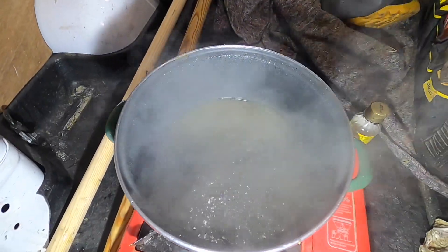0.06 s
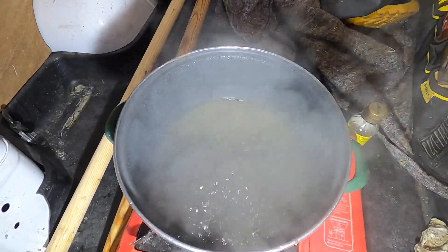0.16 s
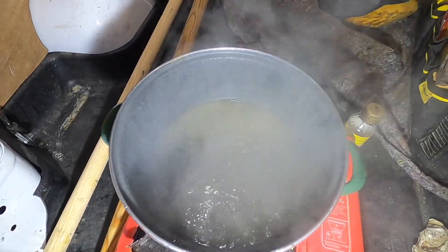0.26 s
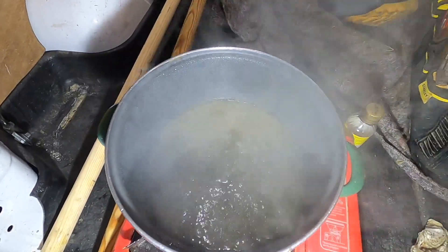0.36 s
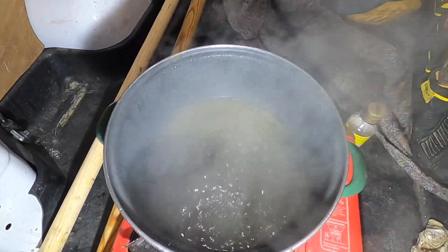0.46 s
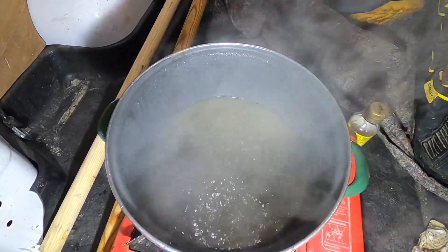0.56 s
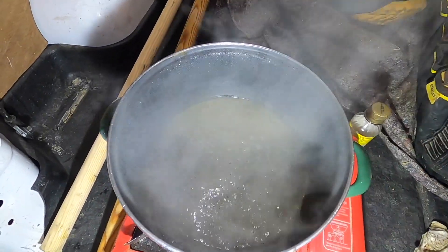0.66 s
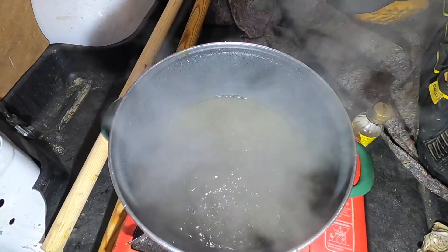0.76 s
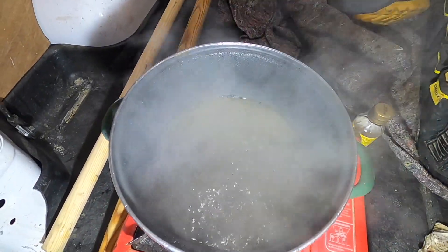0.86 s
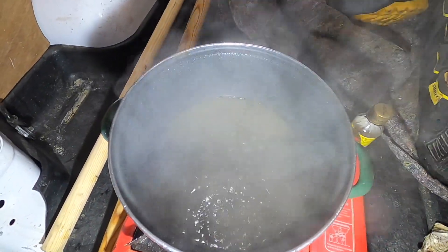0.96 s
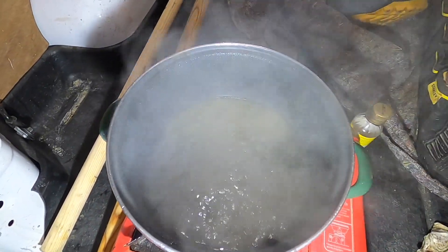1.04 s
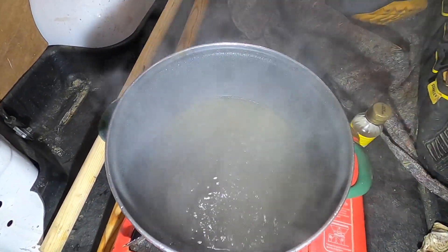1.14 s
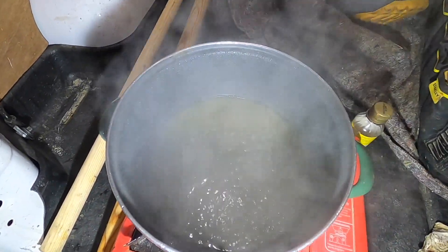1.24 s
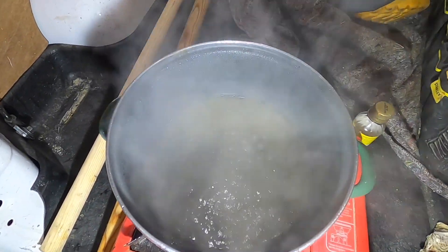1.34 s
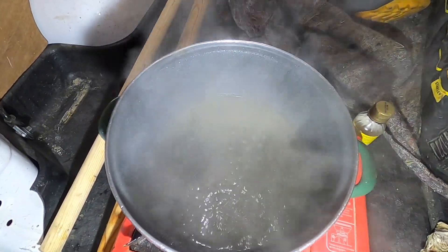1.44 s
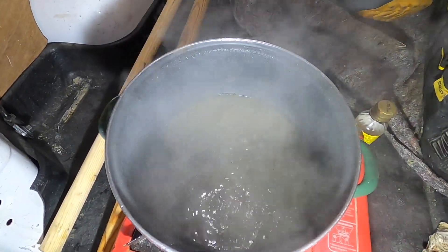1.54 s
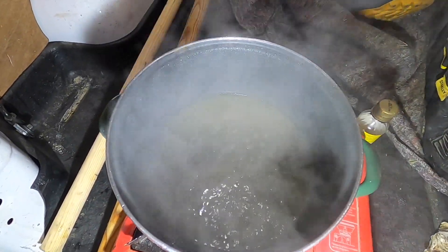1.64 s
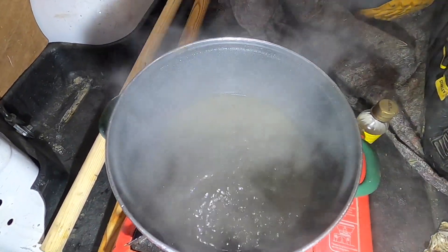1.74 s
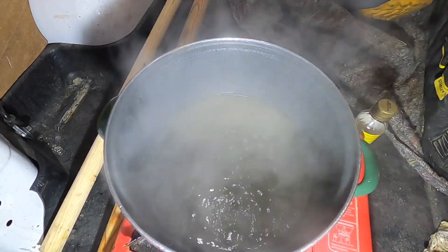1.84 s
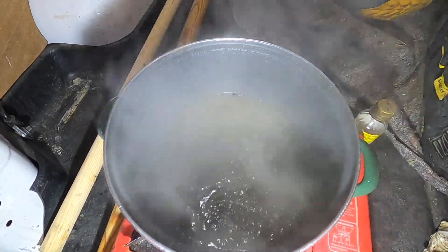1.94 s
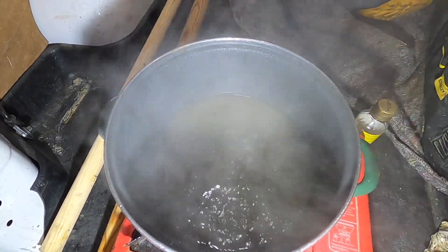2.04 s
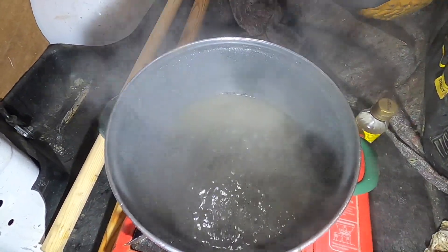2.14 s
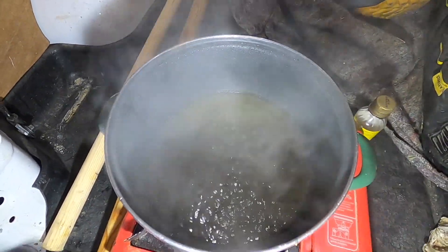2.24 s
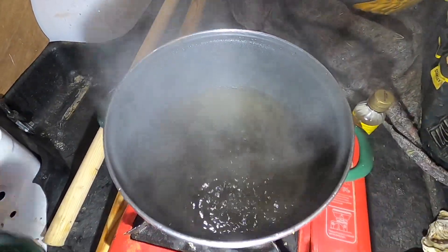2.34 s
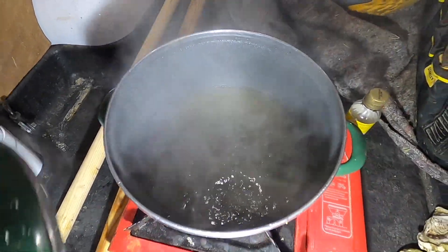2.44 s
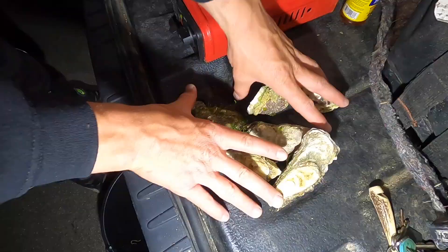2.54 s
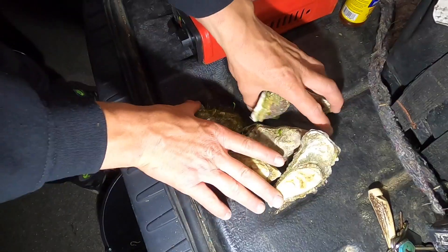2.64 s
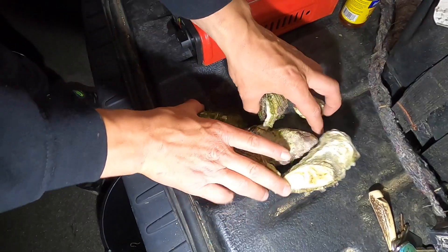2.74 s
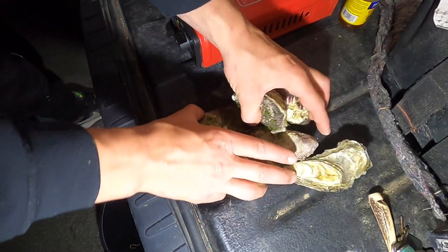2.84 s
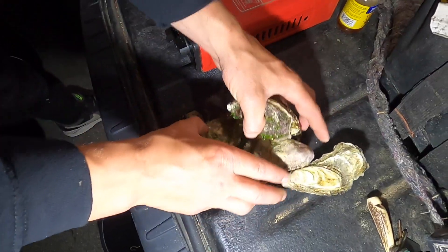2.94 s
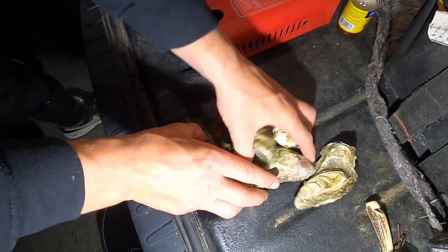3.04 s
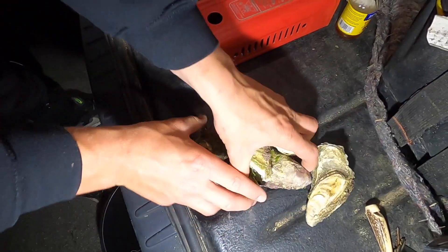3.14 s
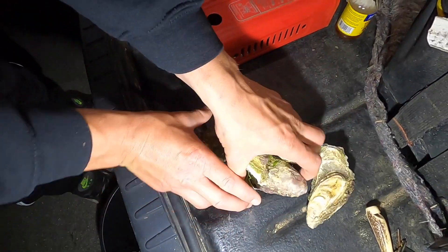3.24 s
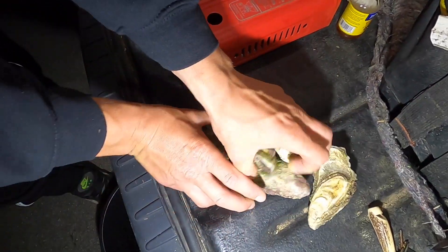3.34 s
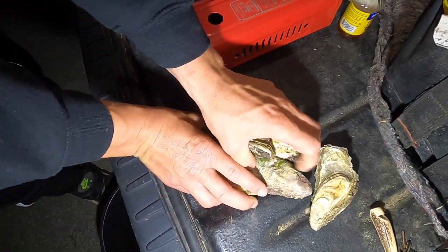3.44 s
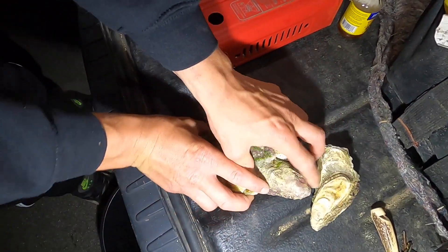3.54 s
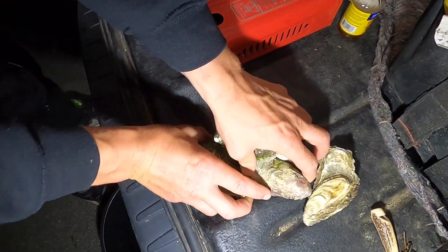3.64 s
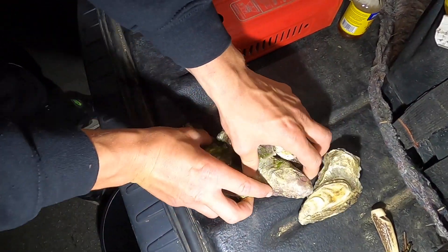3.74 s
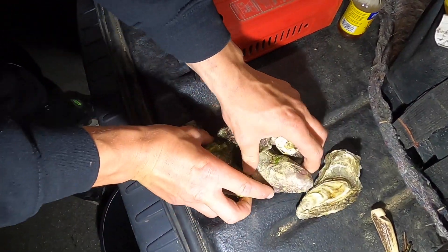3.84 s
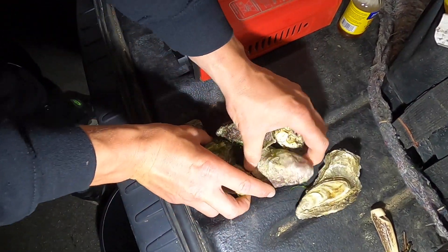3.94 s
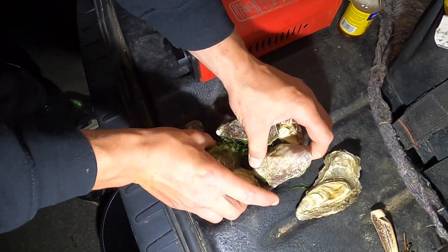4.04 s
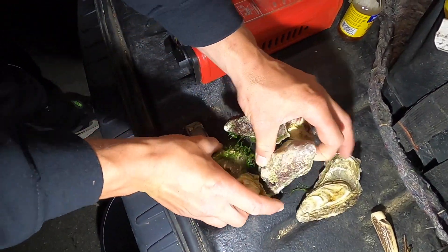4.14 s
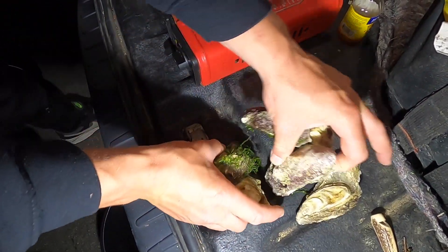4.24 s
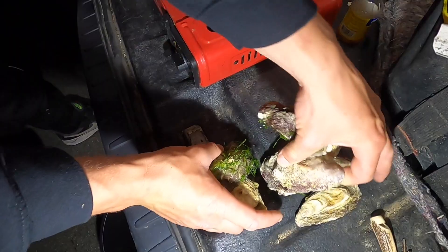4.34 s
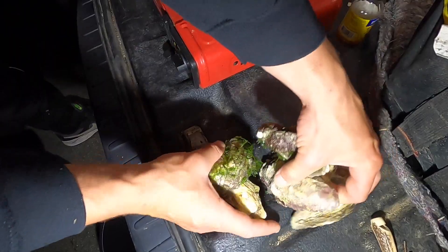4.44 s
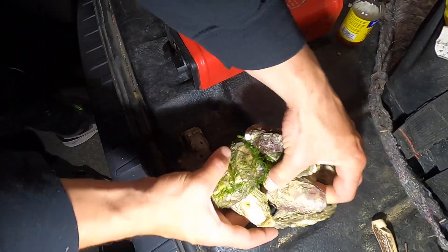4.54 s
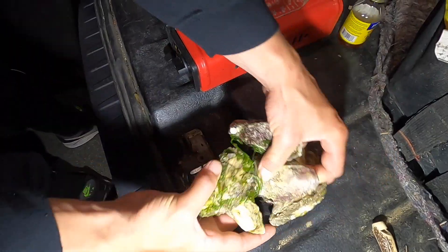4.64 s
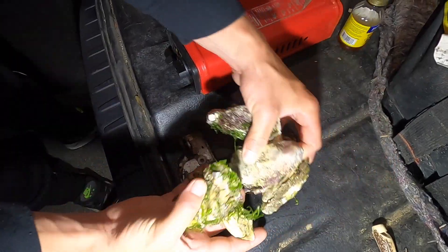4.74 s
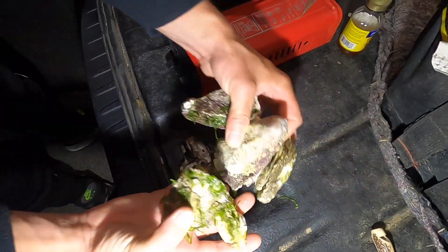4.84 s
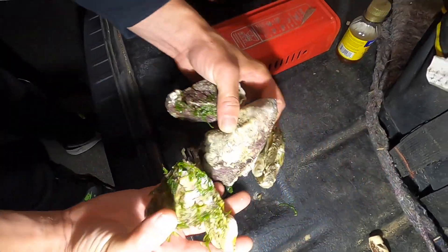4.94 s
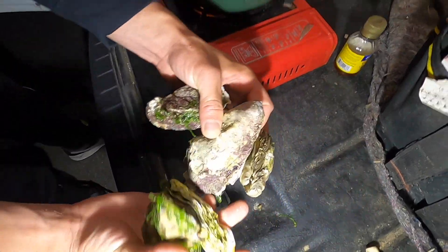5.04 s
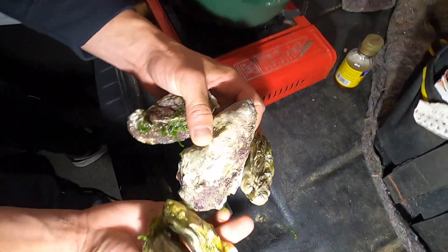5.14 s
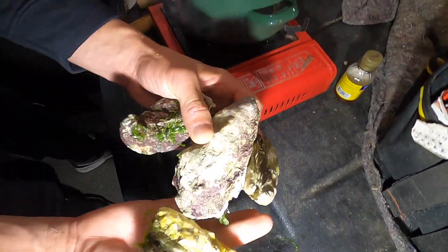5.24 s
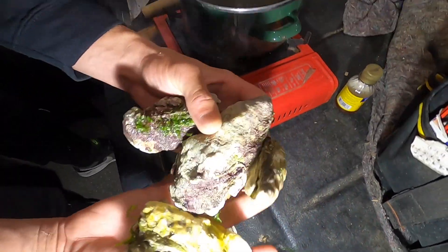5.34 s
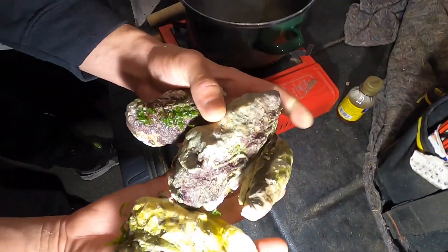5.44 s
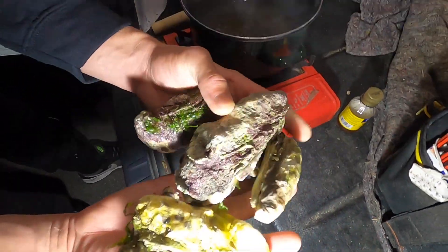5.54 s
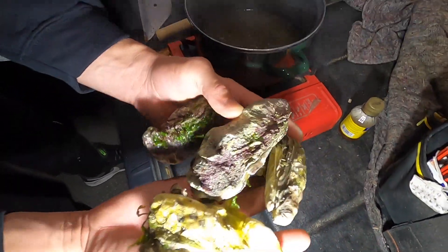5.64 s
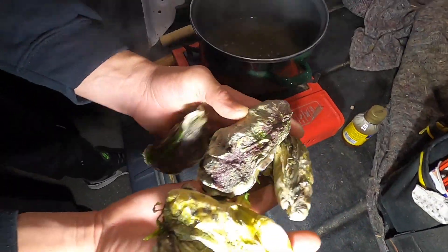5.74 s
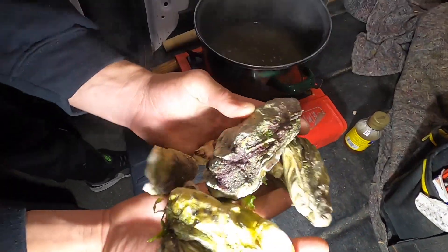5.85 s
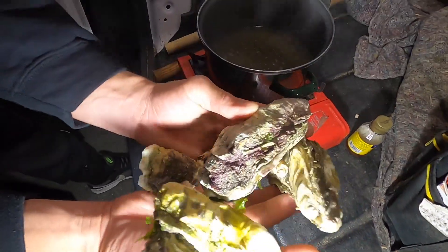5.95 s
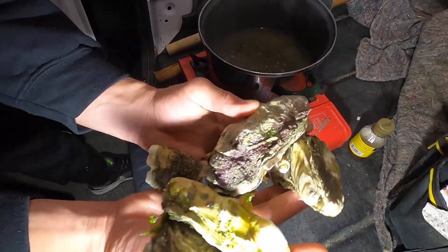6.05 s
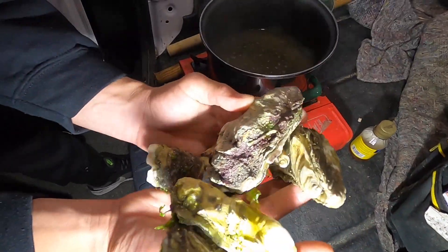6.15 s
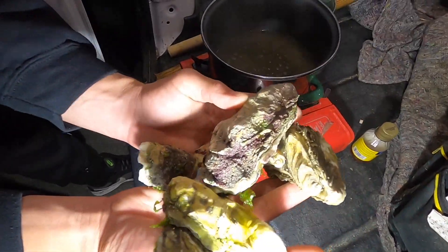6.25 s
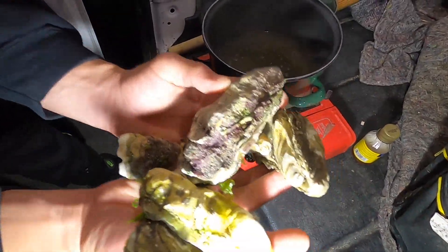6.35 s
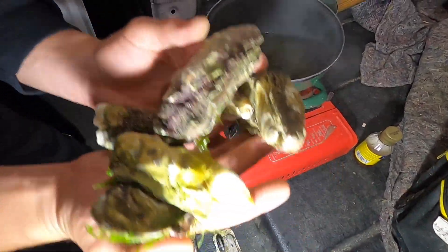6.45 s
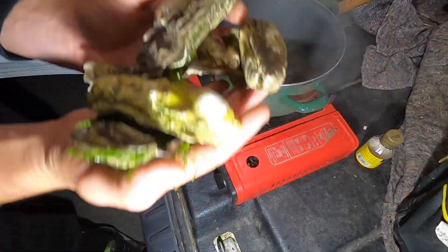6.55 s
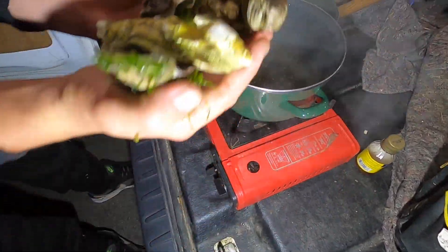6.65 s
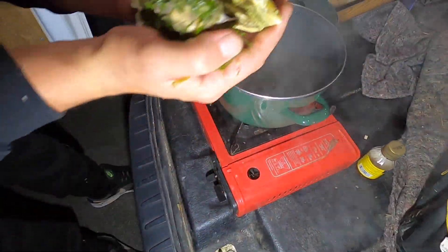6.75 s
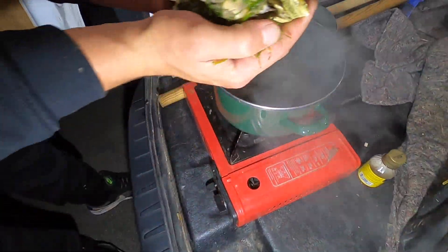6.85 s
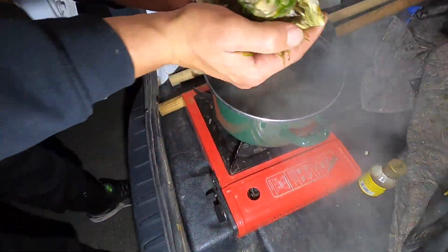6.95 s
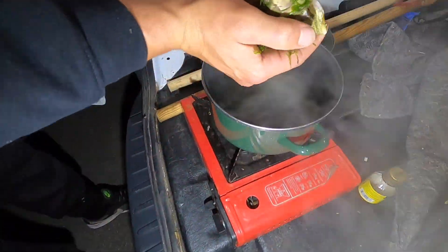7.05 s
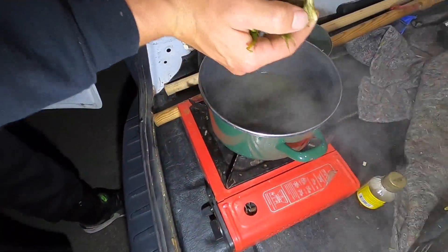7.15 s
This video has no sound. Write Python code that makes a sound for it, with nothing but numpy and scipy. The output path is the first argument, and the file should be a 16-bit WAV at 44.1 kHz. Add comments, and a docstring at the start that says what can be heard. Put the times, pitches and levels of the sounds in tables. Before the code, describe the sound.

Quiet steady hiss and muffled bubbling come first, with deep faint air rumble and tiny ringing ticks. Then rough shells are gathered from a hard liner: dull woody knocks, raspy shoves and short booms from the panel beneath. After a pause comes a sharp shell-on-metal clatter, followed by small dry, stony clicks and gritty rubbing in the hands. Close and dry, inside a vehicle.

```python
"""A pot simmers on a gas burner in the back of a van: shaped noise hisses, hums and flickers over a deep
rumble, with faint ringing taps near the pot. From 2.7 s rough oyster shells are dragged over the ribbed
load floor: streams of tiny blows rasp and boom, and single blows knock and crack. From 5 s the shells
grate and click in the palms, as finer grains and small pitched blows; a quick rattle clanks on metal at
5.2 s. Every blow rings a set of decaying modes."""
import sys
import numpy as np
from scipy import signal
from scipy.fft import rfft, irfft, next_fast_len
from scipy.io import wavfile
from scipy.ndimage import uniform_filter1d

SR = 44100
rng = np.random.default_rng(int(sys.argv[2]) if len(sys.argv) > 2 else 0)


def wav_record(signal):
    """Record a signal, one row per channel, as 16-bit PCM in the file named by sys.argv[1]."""
    frames = np.transpose(np.atleast_2d(signal))
    bounded = np.clip(frames, -1, 1)
    # unit amplitude maps onto the largest positive 16-bit level
    quanta = np.round(bounded * 32767).astype(np.int16)
    wavfile.write(sys.argv[1], SR, quanta)


N = 317079

# Air buffeting the microphone: time_s, level_db
RUMBLE_LEVEL = [(0.0, -74), (0.34, -52.5), (0.44, -68), (0.58, -50.5), (1.7, -63.5), (2.18, -53.5),
                (2.22, -47), (2.74, -62), (3.34, -49), (3.46, -62.5), (3.68, -45), (3.74, -63), (5.27, -50),
                (5.57, -68.5), (5.61, -60), (6.79, -58.5), (7.09, -45), (7.19, -56)]
# Spectrum of burner hiss and simmer, relative: pitch_hz, density_db
HISS_SPECTRUM = [(53, -47), (90, -8.5), (154, -0.5), (227, -4.5), (259, -13), (483, -12.5), (776, -30),
                 (1420, -22.5), (1960, -25.5), (4080, -25.5), (7450, -25.5), (9440, -35), (15500, -49.5)]
# Resonances on top of that spectrum: pitch_hz, width_hz, lift_db
HISS_PEAKS = [(1190, 400, 14), (2470, 390, 7.3), (3150, 210, 5.8), (3880, 350, 5.4), (5000, 160, 3.7),
              (6800, 280, 2.9), (9370, 330, 7.3)]
# Hiss over time, and the van's hum as a change of its lows: time_s, level_db, hum_db
HISS_LEVEL = [(0, -63, -3.5), (2.598, -62.5, -1), (2.68, -64.5, -2), (5, -65.5, 5.5), (5.601, -61.5, -2),
              (6.6, -67, 7), (7.19, -64, -1)]
# The simmer swells near 1.2 kHz: time_s, lift_db
SIMMER_SWELL = [(.5, -5.5), (.6, 6.5), (.88, 9), (.96, -3.5)]
# Left-right likeness of the hiss: pitch_hz, likeness (0 to 1)
HISS_LIKENESS = [(60, 0.99), (130, 1), (290, 0.15), (640, 0.88), (1410, 0.94), (3100, 0.8), (6820, 0.77),
                 (15000, 0.16)]
# Phase by which the left hiss leads: pitch_hz, lead_rad
HISS_LEAD = [(100, 0.44), (4200, 1), (7900, -3), (9500, 0.2), (15000, 3)]
# Stereo width of the background, the difference between the ports over time: time_s, side_db
BACKGROUND_WIDTH = [(0, -19), (.5, -10), (.6, -5.5), (2.62, -1.5), (2.68, -47.5), (4.98, -40), (5.05, -15),
                    (7.19, -2)]

# Modes of what is struck, relative levels: pitch_hz, level_db, t60_s
PANEL_MODES = [(82, -7, 0.2), (123.1, 1, 0.13), (153.4, -6, 0.24), (182.3, 0.5, 0.21), (233, -5.5, 0.12),
               (303, -4, 0.081)]
LINER_MODES = [(463.7, -8.5, 0.051), (570.5, -2, 0.0615), (654.8, 10, 0.02), (708, -6, 0.025),
               (815, 3.5, 0.019), (988, -3, 0.034), (1248, -13, 0.048), (1462, -20.5, 0.048),
               (1500, -33.5, 0.015)]
SHELL_MODES = [(796, 9, 0.024), (1100, 7.5, 0.024), (1564, 24, 0.0062), (1810, 6.5, 0.0062),
               (2045, 10, 0.02), (2500, 0, 0.018), (2749, 10, 0.017), (3370, 11, 0.0036),
               (4096, -1.5, 0.013), (4510, 1, 0.00352), (5365, 1.5, 0.0024), (6070, -18.5, 0.0027),
               (7340, -28.5, 0.022), (8750, -15.5, .004), (10100, -65, .004), (14200, -23.5, 0.0021)]
METAL_MODES = [(586, -19, 0.09), (783, -4.5, 0.075), (991, -2.5, 0.027), (1208, 1, 0.027), (1583, 0, 0.026),
               (2707, 0.5, 0.019), (3300, -10.5, 0.051), (3930, -15.5, 0.047), (3950, 3, 0.0043),
               (5000, -38, 0.0093), (5530, -18.5, 0.028)]
TAP_RING_MODES = [(505, 0, 0.087)]
TAP_TICK_MODES = [(1252, 6, 0.041), (1444, 1, 0.028), (2660, 5, 0.006), (4020, 0, 0.011),
                  (5180, 3.5, 0.0058), (6200, 8.5, 0.0063)]

# Faint taps near the pot: time_s, ring_db, tick_over_ring_db
TAPS = [(0.561, -50.5, 5), (1.024, -53, 2.5), (1.506, -57.5, 4), (2.029, -59, -1), (2.38, -69.5, 16)]
# Shells rattling against the metal: start_s, level_db, favoured_pitch_hz, contact_ms
CLANKS = [(5.159, -14, 1100, 2.5), (5.164, -10, 1970, 5), (5.17, -10.5, 1100, 6.7),
          (5.177, -22.5, 895, 6.9), (5.188, -19.5, 875, 8), (5.199, -16.5, 1500, 3.3)]
# Shells rubbing in the palms: start_s, hold_s, crunch_db, fizz_db, rustle_db
RUBS = [(5.02, 0.0086, -67.5, -64.5, -78), (5.09, .015, -64.5, -65.5, -67),
        (5.168, .012, -32.5, -41.5, -44), (5.23, 0.13, -57.5, -70.5, -84), (5.415, 0.11, -64.5, -77, -66),
        (5.56, 0.056, -54.5, -64, -62), (5.66, 0.16, -71, -72.5, -83), (5.79, 0.1, -61, -62.5, -72),
        (5.925, 0.017, -49.5, -49.5, -53), (6.025, 0.051, -51.5, -55, -50.5), (6.125, 0.021, -57, -53, -47),
        (6.38, 0.0064, -56.5, -53.5, -54.5), (6.5, .01, -63.5, -70.5, -83),
        (6.685, 0.0087, -66.5, -60, -82.5), (6.8, 0.022, -54, -60, -71.5), (7.18, 0.019, -66, -58, -72)]
# Shell edges clicking in the palms: start_s, level_db, favoured_pitch_hz, fizz_over_click_db
CLICKS = [(5.046, -44, 2660, -15), (5.084, -48.5, 2260, -0.5), (5.103, -46, 2215, -13),
          (5.209, -16.5, 3730, -37), (5.278, -33.5, 1130, -21), (5.299, -24.5, 2120, -47),
          (5.419, -43.5, 3150, -14), (5.541, -41.5, 2010, -13), (5.566, -42, 755, -1.5),
          (5.612, -36, 1620, -14), (5.809, -40.5, 1490, -23), (5.908, -36.5, 1860, -19),
          (5.929, -24.5, 3000, -20), (5.943, -35, 2030, -34), (6.002, -24.5, 1880, -23),
          (6.031, -31.5, 3070, -14), (6.057, -38, 824, -10), (6.066, -34.5, 3460, -16),
          (6.094, -33, 4200, -27), (6.147, -31, 3440, -0.5), (6.196, -37, 1280, -34),
          (6.302, -56, 5000, -13), (6.328, -54, 5000, -7), (6.391, -38.5, 3610, -13),
          (6.41, -42.5, 714, -33), (6.495, -44.5, 1294, -8.5), (6.679, -46.5, 5000, 10.5),
          (6.79, -39, 940, -9), (6.824, -36, 1176, -38)]
# Shells knocking on the floor and each other: start_s, relative level_db, crack_over_level_db,
# contact_ms of the crack
KNOCKS = [(2.767, -30, -21.5, 2.3), (2.796, -21, -5.5, 0.55), (2.834, -21, 2.5, 6.4),
          (2.84, -6, -18.5, 1.3), (2.873, -5.5, -24.5, 3.9), (2.895, -10.5, -37, 2.4),
          (2.927, -12.5, -21, 5.1), (2.976, -6, -11.5, 9), (3.137, -3, -20, 1.3), (3.209, -6.5, -15.5, 1.4),
          (3.237, -7, -20.5, 2.1), (3.245, -1, -45.5, 9.3), (3.32, -14.5, -13.5, 9), (3.351, -13, -28, 2.3),
          (3.454, -27.5, -7, 1.4), (3.553, -12, -0.1, 2.7), (3.563, 2, -53.5, 1.9),
          (3.607, -4.5, -35, 0.93), (3.671, -18, -9, 1.8), (3.705, -22, -2, 9.6), (3.734, -9.5, -34, 10),
          (3.759, -10, -68.5, 8), (3.815, -6, -20, 1.7), (3.821, -13.5, -7.5, 3.8),
          (3.918, -22.5, -12.5, 2.1), (3.935, -20.5, -7, 2.6), (3.981, -23.5, -5.5, 2.5),
          (3.993, -25, -6, 3.9), (4.029, -5.5, -42, 7), (4.186, -23, 1.5, 2.2), (4.212, -17, -7, 4.4),
          (4.252, -10.5, -12, 5.4), (4.433, -33.5, -17, 7.9), (4.466, -33.5, -25, 5.2),
          (4.49, -44.5, 3, 1.3), (4.564, -17, -33, 2.5), (4.583, -24, -17, 3.5), (4.666, -11.5, -17, 7.2),
          (4.675, -7.5, -15, 4), (4.72, -7.5, -19, 1.6), (4.741, -6.5, -27, 6.2), (4.816, -17.5, -41, 3.7)]
# Shoves of the shells over the floor: start_s, hold_s, rasp_db, boom_db, grit_db
SHOVES = [(2.735, 0.03, -81, -46, -80), (2.79, 0.05, -32.5, -30.5, -51), (2.86, 0.1, -25, -21, -45),
          (2.96, 0.16, -22.5, -22, -39.5), (3.13, 0.055, -29.5, -26, -45.5), (3.21, 0.059, -22.5, -17, -44),
          (3.3, 0.075, -32, -24.5, -46.5), (3.42, 0.19, -42.5, -39, -54.5), (3.565, 0.055, -35, -24.5, -51),
          (3.655, 0.014, -29, -23, -39), (3.705, 0.046, -23, -44, -47), (3.812, 0.025, -22, -27.5, -51.5),
          (3.87, 0.2, -39.5, -31, -61.5), (4.16, 0.2, -34.5, -33.5, -48.5), (4.4, .08, -56, -44, -77.5),
          (4.59, .012, -36.5, -29.5, -63), (4.665, 0.097, -29, -21, -47.5),
          (4.78, 0.073, -32.5, -23.5, -54.5), (4.91, 0.063, -80, -49.5, -96)]
# Response to the shells: pitch_hz, gain_db
SHELL_RESPONSE = [(20, -27.5), (45, -29), (70, -2.5), (9000, 2), (12000, 1.5), (15500, -3)]

# How fast a stroke builds and lets go: (rise, fall) in dB per s
RASP_SLOPES, BOOM_SLOPES, GRIT_SLOPES, RUB_SLOPES = (810, 615), (670, 340), (500, 960), (970, 500)
# The shells slide on after a stroke: quieter, fading at a share of the fall rate
TRAIL_DB, TRAIL_SHARE = -13, 0.41
# How far modes differ from blow to blow, and the dry snap over the strongest mode
BLOW_SCATTER_DB, BLOW_SNAP_DB = 4., 7.
CLICK_MS = 2.8  # contact of one click
EDGE_HZ = 15800  # upper band limit


def gain_of(db):
    """Decibels to a factor."""
    return 10 ** (np.asarray(db) / 20)


def evened(x):
    """Scaled to rms 1."""
    return x / np.sqrt(np.mean(x ** 2) + 1e-20)


def read(points, hz):
    """A spectrum table at the given frequencies, on a log pitch scale."""
    f, value = np.transpose(points)
    return np.interp(np.log(hz + 1), np.log(f + 1), value)


def level_curve(rows):
    """The second column of a time table at every sample, as a factor."""
    columns = np.transpose(rows)
    return gain_of(np.interp(np.arange(N) / SR, columns[0], columns[1]))


def add(mix, s, sound):
    """Mixes a sound in at time s."""
    part = mix[round(s * SR):][:len(sound)]
    part += sound[:len(part)]


def colour(x, gain):
    """Multiplies the spectrum by gain(hz)."""
    n = next_fast_len(N + 4096)
    return irfft(rfft(x, n) * gain(np.fft.rfftfreq(n, 1 / SR)), n)[..., :N]


def chances(rows):
    """Pairs each event with its own row of random values."""
    return zip(rows, rng.standard_normal((len(rows), 2000)))


def ring(modes, chance, hz=1000., octaves=99., contact_ms=0.084, scatter_db=7.5, detune=0.024, snap_db=-40.):
    """One blow, peak 1: a rough edge crushes for a moment; the spot struck favours modes near hz."""
    f, db, t60 = np.transpose(modes)[..., None]
    t = np.arange(round(SR * min(t60.max(), .3))) / SR
    level_chance, pitch_chance = chance[:len(f), None], chance[len(f):2 * len(f), None]
    db = db - 6 * (np.log2(f / hz) / octaves) ** 2 + scatter_db * level_chance
    rise = 1 - np.exp(-4. * f * t)  # a blunt contact takes part of a cycle to build
    decay = gain_of(db - 60 * t / t60)
    x = (rise * decay * np.sin(2 * np.pi * f * (1 + detune * pitch_chance) * t)).sum(0)
    # dry snap that does not ring
    x += gain_of(db.max() + snap_db) * np.exp(-2.5 * hz * t) * np.sin(2 * np.pi * hz * t)
    u = np.arange(len(chance)) / SR * 1000 / np.clip(contact_ms, .05, 20)
    force = chance[::-1] ** 3 * u ** 1.6 * np.exp(-2.2 * u)  # spiky: crumbs break one by one
    x = signal.fftconvolve(x, force)
    return x / abs(x).max()


def grains(modes, on, per_s, spread_db, contact_ms, detune, count=16):
    """Many small blows at random moments and on different spots, rms 1 while on."""
    n = on.sum()
    size = gain_of(spread_db * np.minimum(rng.exponential(1, n), 4))
    size = size * (rng.random(n) < per_s / SR)
    spot, part, out = rng.integers(0, count, n), np.zeros(n), np.zeros(N)
    lowest_highest = np.log([modes[0][0], modes[-1][0]])
    levels = [m[:2] for m in modes]
    for k, (_, chance) in enumerate(chances(range(count))):
        hz = np.exp(np.interp((k + .5) / count, [0, 1], lowest_highest))
        blow = evened(ring(modes, chance[:300], hz, 1.4, contact_ms, detune=detune))
        blow = blow * gain_of(read(levels, hz) / 2)
        part += signal.oaconvolve(size * (spot == k), blow)[:n]
    out[on] = part / np.sqrt(uniform_filter1d(part ** 2, size=2000) + 1e-12)
    return out


def strokes(rows, column, slopes):
    """Pressure of a run of strokes: each builds up, holds, lets go and trails off."""
    t, power = np.arange(N) / SR, 0
    rise, fall = slopes
    for row in rows:
        start, hold = row[:2]
        early, late = np.maximum(start - t, 0), np.maximum(t - start - hold, 0)
        fall_db = np.maximum(-fall * late, TRAIL_DB - TRAIL_SHARE * fall * late)
        power = power + gain_of(row[column] - rise * early + fall_db) ** 2
    return np.sqrt(power)


def during(rows):
    """True from 0.1 s before the first stroke starts until 0.3 s after the last one starts."""
    t = np.arange(N) / SR
    return (t > rows[0][0] - .1) & (t < rows[-1][0] + .3)


def cabin(x, t60):
    """Close walls and cloth: sparse taps of random sign that die fast, different at each port."""
    at = np.arange(80, 8000, 20) + rng.integers(0, 20, (2, 396))
    taps = np.zeros((2, 8040))
    np.put_along_axis(taps, at, rng.choice([-1., 1.], at.shape) * gain_of(-60 * at / SR / t60), 1)
    return signal.fftconvolve(x[None], taps / np.linalg.norm(taps[0]), axes=1)[:, :N]


def ports(x, spacing_s):
    """A source off to one side reaches the two ports a moment apart."""
    slope = np.gradient(x) * SR
    return x + np.outer([-.5, .5], spacing_s * slope)


def rumble():
    """Air buffeting the microphone: lumpy deep noise, mostly shared by both ports."""
    sos = signal.butter(2, [16, 46], "band", fs=SR, output="sos")
    shared, own = signal.sosfilt(sos, rng.standard_normal((2, N)))
    shared = shared / np.sqrt(uniform_filter1d(shared ** 2, size=12000))
    side = np.outer([1, -1], gain_of(-9.5) * evened(own))
    return level_curve(RUMBLE_LEVEL) * (shared + side)


def burner():
    """Hiss with drifting patches, a swelling simmer and hum; bursting bubbles flicker in the treble."""
    frames, hz = N // 128 + 5, np.fft.rfftfreq(512, 1 / SR)
    t = np.arange(frames) * 128 / SR
    a, b, c, d, patches = rng.standard_normal((frames, 257, 5)).T
    patches = uniform_filter1d(uniform_filter1d(patches, size=6, axis=0), size=20, axis=1)
    patches = evened(patches)
    bubbles = 7 * np.minimum(rng.exponential(0.46, frames), 2) * (rng.random(frames) < .06)
    treble = np.clip((hz - 2500) / 2000, 0, 1)[:, None]
    db = read(HISS_SPECTRUM, hz)
    db = db + sum(p / (1 + ((hz - f) / (w / 2)) ** 2) for f, w, p in HISS_PEAKS)
    db[hz < 80] = -200
    s, _, hum_db = np.transpose(HISS_LEVEL)
    hum = (hz < 450)[:, None] * np.interp(t, s, hum_db)
    swell = np.exp(-((hz - 1190) / 130) ** 2)[:, None] * np.interp(t, *np.transpose(SIMMER_SWELL))
    # the right port shares part of the left noise, shifted in phase
    same, left = np.clip(read(HISS_LIKENESS, hz), 0, 1)[:, None], a + 1j * b
    right = same * left * np.exp(-1j * read(HISS_LEAD, hz))[:, None]
    right = right + np.sqrt(1 - same ** 2) * (c + 1j * d)
    shape = gain_of(db[:, None] + 0.75 * patches + treble * bubbles + hum + swell)
    hiss = signal.istft(np.array([left, right]) * shape, nperseg=512, noverlap=384)[1][:, :N]
    return level_curve(HISS_LEVEL) * evened(hiss)


def pot_taps():
    """Faint taps near the pot: a scratchy tick, then 10 ms later a short ring."""
    out = np.zeros(N)
    for (s, db, tick_db), chance in chances(TAPS):
        body = ring(TAP_RING_MODES, chance, contact_ms=20.0, detune=0.0029)
        tick = ring(TAP_TICK_MODES, chance, contact_ms=14.6, scatter_db=0.5, snap_db=-3.5)
        add(out, s - .003, gain_of(db) * body)
        add(out, s - .013, gain_of(db + tick_db) * tick)
    return out


def metal_clanks():
    """A quick rattle of shells rings the modes of sheet metal."""
    out = np.zeros(N)
    for (s, db, hz, ms), chance in chances(CLANKS):
        blow = ring(METAL_MODES, chance, hz, 2.27, ms, scatter_db=BLOW_SCATTER_DB, detune=0.037,
                    snap_db=BLOW_SNAP_DB)
        add(out, s, gain_of(db) * blow)
    return out


def palms():
    """Shells rub into gritty grating, in three bands of shell modes, under separate clicks."""
    on = during(RUBS)
    crunch = grains(SHELL_MODES[:9], on, 2500, 5.8, 0.078, 0.048, count=32)
    fizz = grains(SHELL_MODES[8:], on, 5000, 5.9, 0.027, 0.3, count=32)
    rustle = grains(SHELL_MODES[7:9], on, 2500, 7.4, 0.15, 0.035, count=16)
    layers = enumerate([crunch, fizz, rustle], start=2)
    out = sum(strokes(RUBS, column=k, slopes=RUB_SLOPES) * x for k, x in layers)
    for (s, db, hz, fizz_db), chance in chances(CLICKS):
        click = ring(SHELL_MODES[:12], chance, hz, 0.41, CLICK_MS, scatter_db=4.5, snap_db=8.5)
        click_fizz = ring(SHELL_MODES[11:], chance, contact_ms=CLICK_MS,
                          scatter_db=BLOW_SCATTER_DB, detune=0.18)
        add(out, s, gain_of(db) * click)
        add(out, s, gain_of(db + fizz_db) * click_fizz)
    return out


def knocks():
    """Each blow is a crack of shell, a knock of the liner favouring 660 Hz and a boom of the panel."""
    out = np.zeros(N)
    for (s, db, crack_db, ms), chance in chances(KNOCKS):
        knock = ring(LINER_MODES, chance, 660, 1.0, 0.31 * ms, scatter_db=6.0, snap_db=-3.5)
        boom = ring(PANEL_MODES, chance, scatter_db=1.0)
        crack = ring(SHELL_MODES[3:14], chance[4:], 2300, 3.1, ms, scatter_db=BLOW_SCATTER_DB,
                     snap_db=BLOW_SNAP_DB)
        add(out, s, gain_of(db - 4.0) * knock)
        add(out, s, gain_of(db - 13.5) * boom)
        add(out, s, gain_of(db + crack_db) * crack)
    return out


def drag():
    """Barnacles catching on the ribs shake the liner (rasp), the panel (boom) and the shells (grit)."""
    on = during(SHOVES)
    rasp = grains(LINER_MODES, on, 600, 3.7, 0.26, 0.042, count=24)
    rasp = strokes(SHOVES, column=2, slopes=RASP_SLOPES) * rasp
    boom = grains(PANEL_MODES, on, 260, 3.5, .06, 0.041)
    boom = strokes(SHOVES, column=3, slopes=BOOM_SLOPES) * boom
    grit = grains(SHELL_MODES[3:13], on, 2200, 3.0, 0.62, 0.1, count=32)
    grit = strokes(SHOVES, column=4, slopes=GRIT_SLOPES) * grit
    return rasp + boom + grit


def scene():
    """Floor sounds come through the structure, nearly the same at both ports; the hands are wider."""
    air = burner() + rumble()
    clank = metal_clanks() + pot_taps()
    hands = palms()
    floor = drag() + knocks()
    clank = clank + gain_of(-9) * cabin(clank, .18).mean(0)
    hands = ports(hands, 1.6e-5) + gain_of(-22) * cabin(hands, 0.14)
    floor = floor + gain_of(-8.5) * cabin(floor, 0.03)[0]
    struck = ports(floor, 1e-6) + hands + ports(clank, 4e-6)
    struck = colour(struck, lambda hz: gain_of(read(SHELL_RESPONSE, hz)))
    middle = air.mean(0)
    return struck + middle + level_curve(BACKGROUND_WIDTH) * (air - middle)


def record(dry):
    """The housing shades the left port: top treble weaker and out of step; then the band limit."""
    top = lambda hz: np.clip((hz - 9500) / 3000, 0, 1)
    left = colour(dry[0], lambda hz: gain_of(-5. * top(hz)) * np.exp(1.6j * top(hz)))
    wet = np.array([left, dry[1]])
    low_pass = signal.firwin(511, EDGE_HZ, window=("kaiser", 9), fs=SR)
    return signal.oaconvolve(wet, low_pass[None], "same")


dry = scene()
out = record(dry)
wav_record(out)
```